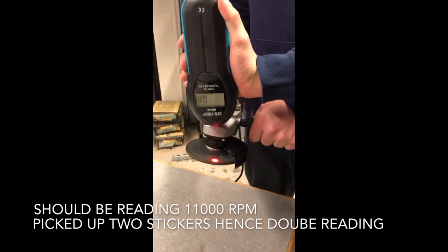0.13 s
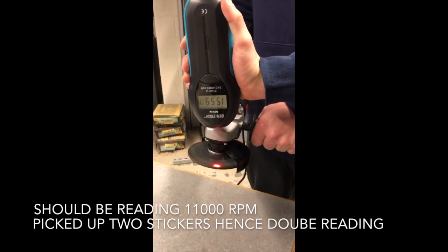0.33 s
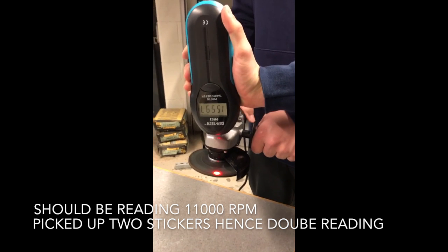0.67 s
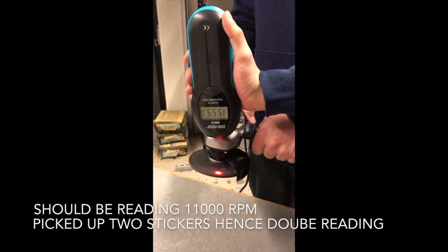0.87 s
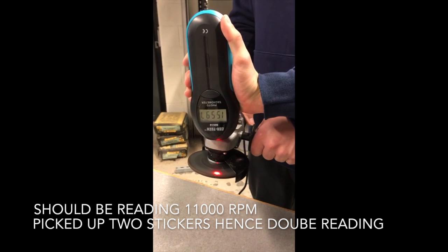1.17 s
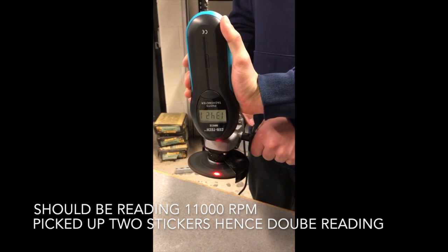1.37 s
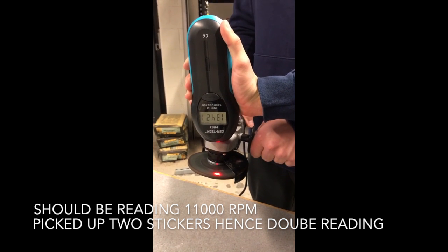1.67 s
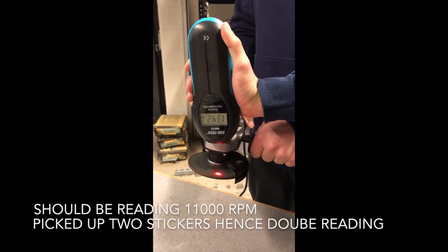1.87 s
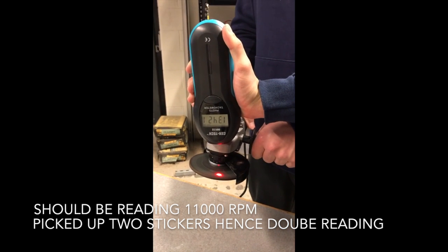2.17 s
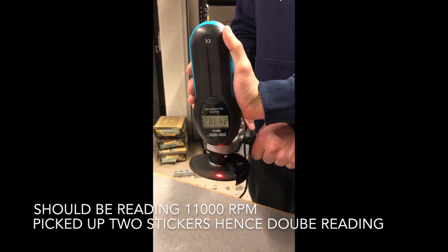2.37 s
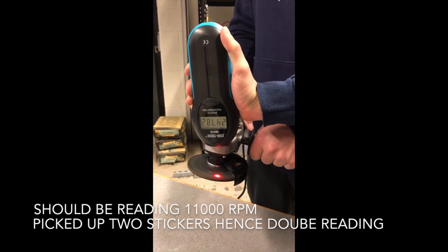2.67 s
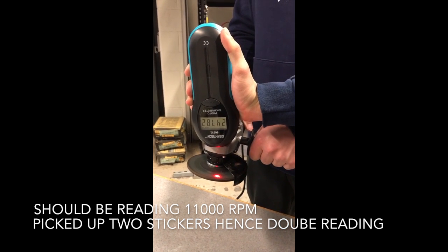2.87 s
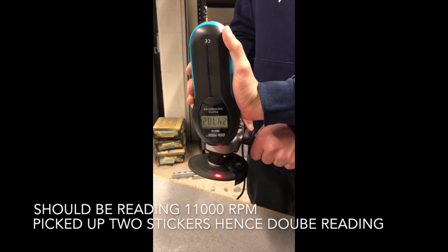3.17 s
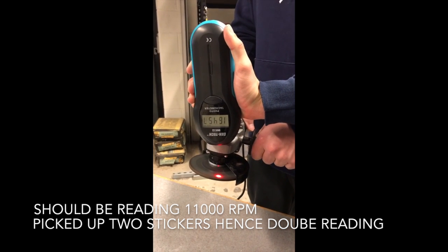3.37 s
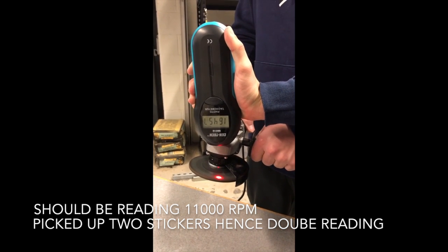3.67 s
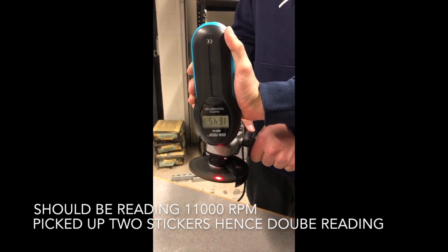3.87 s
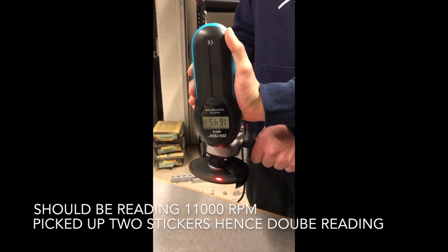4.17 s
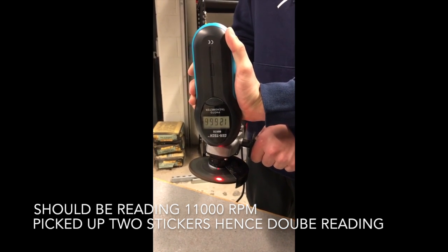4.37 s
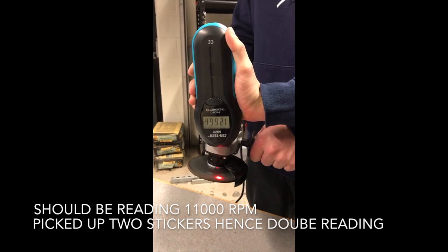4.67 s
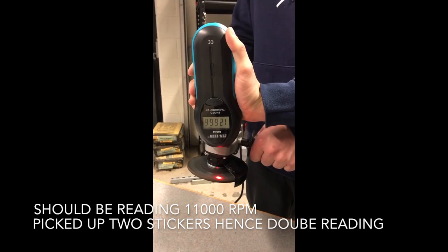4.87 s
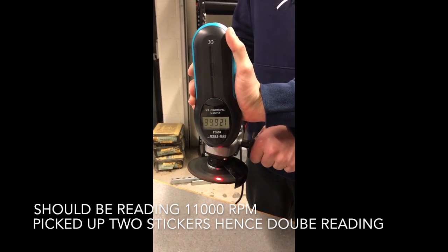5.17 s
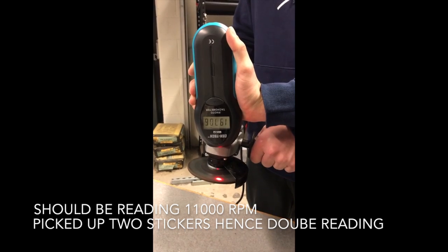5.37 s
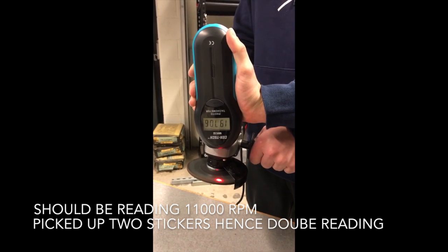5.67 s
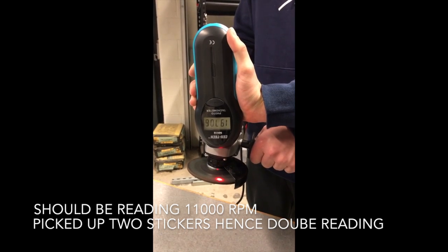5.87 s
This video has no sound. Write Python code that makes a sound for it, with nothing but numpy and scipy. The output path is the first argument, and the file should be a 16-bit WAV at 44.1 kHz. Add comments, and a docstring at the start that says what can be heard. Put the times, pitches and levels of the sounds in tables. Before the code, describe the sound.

An electric angle grinder is already spinning and climbs in pitch over the first two seconds or so. It then runs free at full speed, holding a steady high whine over a rush of fan air and thin hiss. Its gears rattle lightly throughout, with occasional sharper ticks. The tool sounds close, in a small workshop with little echo and a faint low hum.

```python
"""An angle grinder running free

The disc spins up over a workbench and settles near 10700 turns a minute. Spindle, rotor and gear
mesh radiate tones at fixed multiples of that one speed. Fan turbulence and tooth impacts supply
broadband noise, which the resonances of the housing colour. The gears rattle and now and then
knock in their backlash, under a thin hiss and over a low drone in the workshop."""
import sys
import numpy as np
from scipy import signal
from scipy.fft import rfft, irfft, next_fast_len
from scipy.io import wavfile
from scipy.ndimage import uniform_filter1d

SR = 44100
rng = np.random.default_rng(int(sys.argv[2]) if len(sys.argv) > 2 else 0)


def persist_wave(psi):
    """Save psi, clipped to +-1, as 16-bit WAV."""
    counts = np.round(np.clip(psi, -1, 1) * 32767).astype(np.int16)
    wavfile.write(sys.argv[1], SR, np.atleast_2d(counts).T)


N = 265349
TIME = np.arange(N) / SR
FFT_SIZE = next_fast_len(N + SR // 4, real=True) // 2 * 2
FREQS = np.arange(FFT_SIZE // 2 + 1) * SR / FFT_SIZE
PINION_TEETH, CROWN_TEETH = 12, 37  # on the rotor, on the spindle

# Bands of low rumble. Each row: centre in Hz, width in Hz, level in dB.
RUMBLE_BANDS = [(64, 14, -53.5), (79.7, 8.7, -50.5)]
# Course of the high hiss. Each row: time in seconds, centre in Hz, relative level in dB.
SIZZLE_COURSE = [(0, 9600, -37), (.25, 9800, -42), (.45, 9370, -40.5), (1.1, 9500, -43), (2.5, 9400, -37),
                 (2.9, 9350, -43), (4.4, 9420, -39), (4.8, 9800, -42), (6, 9684, -40)]
# Main mode of the gear head: centre in Hz, width in Hz, level in dB.
MAIN_MODE = (2226, 44, -41.5)
# Gear head modes under load. Each row: centre in Hz, width in Hz, level at full torque in dB.
STRAIN_MODES = [(1790, 79, -33), (4276, 250, -34), (5000, 520, -34), (5830, 440, -33), (7030, 140, -39),
                (7700, 300, -37)]
# Resonances of housing and gear head. Each row: centre in Hz, width in Hz, lift in dB.
HOUSING_MODES = [(1203, 196, 3.5), (2220, 110, 2.8), (2140, 990, 3), (3480, 400, 3.5), (4600, 378, 6),
                 (5084, 291, 6), (5383, 27, 8.5), (6170, 800, 7.5), (7037, 14, 4.4), (7661, 27, 3.5),
                 (9350, 1100, 6.5), (9900, 300, 3.5), (10400, 400, -1.5), (6850, 250, -2),
                 (12095, 140, 8.5), (12680, 480, 3.3), (14200, 500, 1.5), (15050, 450, 2)]
# Strength of the light rattle. Each row: time in seconds, mean relative peak in dB.
RATTLE_COURSE = [(0, -22), (0.85, -15.5), (1.5, -16.5), (2.7, -19), (3.3, -14.5), (4.3, -16.5), (6, -17)]
# The hardest backlash knocks. Each row: start in seconds, relative peak in dB.
HARD_KNOCKS = [(0.618, -11.5), (0.831, -12), (0.9517, -10), (0.9805, -10), (1.0103, -8), (1.046, -13),
               (1.2465, -14), (2.094, -14), (2.4239, -10), (2.5984, -10), (2.6389, -13), (2.7068, -11),
               (2.8983, -10), (3.1068, -11), (3.5813, -8.5), (3.715, -15), (3.8605, -13), (3.9045, -14),
               (3.9489, -13), (4.4566, -11), (4.5341, -12)]
# Spectrum of a knock ahead of the housing. Each row: frequency in Hz, relative level in dB.
KNOCK_SPECTRUM = [(500, -30), (2000, -13), (4200, -17), (5000, -9), (5600, -16), (6120, 2), (6500, 0),
                  (6900, -10), (7600, -7.5), (9400, -19), (11300, -19), (12150, -10), (12800, -10.5),
                  (16000, -15)]
# Spindle harmonics, from once a turn upwards. Each row: level in dB, change at full torque in dB.
SPINDLE_TONES = [(-64.5, 13), (-62.5, 4), (-53.5, 10), (-51, 0.5), (-40, -10), (-47.5, -3), (-46, 7),
                 (-70, 9.5), (-51.5, -4)]
# Rotor tones as multiples of the rotor's speed; the 12th and 24th belong to the gear mesh.
ROTOR_ORDERS = [1, 2, 3, 4, 5, 12, 18, 24]
# Strength of those orders. Each row: level before resonance in dB, change at full torque in dB.
ROTOR_TONES = [(-46, 2.5), (-50, -8), (-53.5, 12.5), (-47, -6), (-52, 21), (-48, 11), (-59, 0), (-54, 1.5)]
# Resonances that the rotor's tones sweep through. Each row: centre in Hz, width in Hz, lift in dB.
SWEPT_MODES = [(493, 40, 7.5), (526, 24, -4), (1440, 130, 10)]
# Spectrum of air and clatter ahead of the housing. Each row: frequency in Hz, relative level in dB.
RUSH_SPECTRUM = [(30, -18), (130, -15.5), (280, -16.5), (480, -18), (700, -14.5), (1000, -5), (1550, -5),
                 (2400, 1), (4000, -6), (5600, -10.5), (8200, -11), (10600, -16), (13000, -10.5),
                 (16000, -13.5)]
# The clatter's part in that spectrum. Each row: frequency in Hz, share in dB before it is capped.
CLATTER_SHARE = [(500, -17.5), (2300, -7.5), (4500, -2), (6500, -3), (10000, 0.5), (15000, -3.5)]


def undb(db):
    """Amplitude grows tenfold with every 20 dB."""
    return 10 ** (np.asarray(db) / 20)


def unit(x):
    """Division by the rms gives a signal unit power."""
    return x / np.sqrt(np.mean(x ** 2))


def curves(table):
    """Linear interpolation gives each column of a timed table one value a sample."""
    times, *columns = np.transpose(table)
    return [np.interp(TIME, times, column) for column in columns]


def slope_db(points):
    """A spectral envelope in dB runs straight between its points over log frequency."""
    hz, db = np.transpose(points)
    return np.interp(np.log(FREQS + 1), np.log(hz), db)


def lift_db(hz, modes):
    """Each resonance adds a Lorentzian peak or dip to the response in dB."""
    return sum(db / (1 + (2 * (hz - centre) / width) ** 2) for centre, width, db in modes)


def through_housing(points):
    """Source and filter add in dB: a spectrum takes on the housing's resonances, at unit power."""
    db = slope_db(points) + lift_db(FREQS, HOUSING_MODES)
    return db - 10 * np.log10(np.mean(undb(db) ** 2))


def colour(x, db):
    """A minimum-phase filter is causal, so its resonances ring after each push."""
    cepstrum = irfft(np.log(undb(db)))
    cepstrum[1:FFT_SIZE // 2] *= 2
    cepstrum[FFT_SIZE // 2 + 1:] = 0
    return irfft(rfft(x, FFT_SIZE) * np.exp(rfft(cepstrum)))[:N]


def walk(rate_hz):
    """Low-passed noise of rms 1 wanders about rate_hz times a second."""
    white = rfft(rng.standard_normal(FFT_SIZE))
    return unit(irfft(white * np.exp(-(FREQS / rate_hz) ** 2))[:N])


def band(hz, width_hz):
    """A resonance driven at random yields a band of noise, here of rms 1."""
    white = rfft(rng.standard_normal(FFT_SIZE))
    return unit(irfft(white / (1 + 2 * ((FREQS - hz) / width_hz) ** 2))[:N])


def torque(spin_hz):
    """The accelerating load on the gears falls from 1 to 0 as the motor nears full speed."""
    return (spin_hz.max() - spin_hz) / np.ptp(spin_hz)


def workshop(x, wet_db=-19, t60_s=.25):
    """Reflections from bench, shelves and walls merge into a short exponential tail."""
    tail = rng.standard_normal(N) * undb(-60 * TIME / t60_s) * (TIME > .002)
    return x + undb(wet_db) * signal.fftconvolve(x, tail / np.linalg.norm(tail))[:N]


def drone(spin_hz, hum_hz=219.5, hum_db=-53.5, load_db=5, waver_db=2.9, drift=0.0017):
    """Narrow noise bands heave slowly, under a hum that wavers and eases with the load."""
    phase = 2 * np.pi * np.cumsum(hum_hz * (1 + drift * walk(4.9))) / SR
    level_db = hum_db + load_db * torque(spin_hz) + waver_db * walk(3.5)
    hum = np.sqrt(2) * undb(level_db) * np.sin(phase)
    return hum + sum(undb(db) * band(hz, width) for hz, width, db in RUMBLE_BANDS)


def sizzle(width_hz=260, gain_db=2.0):
    """Noise modulating a wandering carrier makes a thin metallic hiss, likely that of the brushes."""
    hz, db = curves(SIZZLE_COURSE)
    phase = 2 * np.pi * np.cumsum(hz) / SR
    hiss = band(0, width_hz) * np.cos(phase) + band(0, width_hz) * np.sin(phase)
    return undb(db + gain_db) * hiss


def gear_head_ring(surge_db=2.5, surge_hz=5):
    """Random excitation by the clatter sustains the gear head's main mode, in short surges."""
    hz, width, db = MAIN_MODE
    return undb(db) * unit(band(hz, width) * undb(surge_db * walk(surge_hz)))


def gear_strain(spin_hz):
    """Loaded teeth drive the gear head's modes with an amplitude proportional to the torque."""
    return sum(undb(db) * band(hz, width) for hz, width, db in STRAIN_MODES) * torque(spin_hz)


def runout(spin_hz, rub_db=-24):
    """An eccentric crown wheel bites once a turn, giving a force pulse that is mostly light."""
    turns = np.cumsum(spin_hz) / SR
    bite = rng.random(N)[turns.astype(int)] ** 2
    return undb(rub_db) * bite * np.sin(np.pi * turns) ** 2


def bounces(spin_hz, free_hz=24.98, load_hz=21.88, jitter=0.15, scatter_db=3.0):
    """Backlash lets the wheel bounce. Each row returned: start in seconds, relative peak in dB."""
    rate_hz = (free_hz + load_hz * torque(spin_hz)) * (1 + jitter * walk(20))
    onsets = np.flatnonzero(np.diff(np.floor(np.cumsum(rate_hz) / SR)) > 0)
    mean_db, = curves(RATTLE_COURSE)
    peak_db = mean_db + scatter_db * (2 * rng.random(N) - 1)
    hard_s = np.transpose(HARD_KNOCKS)[0]
    # a bounce within half a period of a hard knock gives way to it
    return [(TIME[i], peak_db[i]) for i in onsets if np.abs(hard_s - TIME[i]).min() * rate_hz[i] > .5]


def backlash_knocks(spin_hz, gain_db=-6.0, rise_s=0.0021, width_s=0.00098, tail_db=-14, tail_s=.007):
    """Crossing its backlash, the wheel strikes in a brief pulse; the gear head's ring then decays."""
    force = runout(spin_hz)
    for start_s, db in list(HARD_KNOCKS) + bounces(spin_hz):
        near = np.abs(TIME - start_s) < .05
        age = TIME[near] - start_s - rise_s
        blow = np.exp(-.5 * (age / width_s) ** 2)
        tail = undb(tail_db) * (age > 0) * np.exp(-np.abs(age) / tail_s)
        force[near] = np.maximum(force[near], undb(db) * (blow + tail))
    metal = colour(rng.standard_normal(N), through_housing(KNOCK_SPECTRUM))
    analytic = signal.hilbert(metal, FFT_SIZE)[:N]
    envelope = np.sqrt(uniform_filter1d(np.abs(analytic) ** 2, size=96))
    # with the metal's envelope divided out, the force alone sets how loud each blow is
    return undb(gain_db) * force * unit(analytic.real / envelope)


def whine(spin_hz, waver_db=0.97, waver_hz=5, wobble=0.0007):
    """Gearing locks two harmonic series; the rotor's fundamental beats with the spindle's third tone."""
    turns = np.cumsum(spin_hz * (1 + wobble * walk(9.2))) / SR
    ratio, load = CROWN_TEETH / PINION_TEETH, torque(spin_hz)

    def tone(multiple, db, load_db):
        gain = undb(db + load_db * load + waver_db * walk(waver_hz))
        return np.sqrt(2) * gain * np.sin(2 * np.pi * (multiple * turns + rng.random()))

    spindle = sum(tone(k, db, load_db) for k, (db, load_db) in enumerate(SPINDLE_TONES, 1))
    rotor = sum(tone(k * ratio, db + lift_db(k * ratio * spin_hz, SWEPT_MODES), load_db)
                for k, (db, load_db) in zip(ROTOR_ORDERS, ROTOR_TONES))
    return spindle + rotor


def fan_air(flutter_db=.5, flutter_hz=79):
    """Turbulence at the cooling fan and the disc's rim makes fluttering broadband noise."""
    return unit(rng.standard_normal(N) * undb(flutter_db * walk(flutter_hz)))


def tooth_clatter(spin_hz, scatter_db=6.0, chatter_db=4.0, chatter_hz=220, surge_db=-1.1, surge_hz=35):
    """Tooth impacts of unequal force modulate noise at the mesh rate, in short surges."""
    tooth = (np.cumsum(spin_hz) / SR * CROWN_TEETH).astype(int)
    force_db = scatter_db * rng.standard_normal(N)[tooth]
    force_db += chatter_db * walk(chatter_hz) + surge_db * walk(surge_hz)
    cushioned_db = np.minimum(force_db, 4.5)  # grease softens the hardest blows
    return unit(rng.standard_normal(N) * undb(cushioned_db))


def rush(spin_hz, air_gain_db=-20.5, clatter_gain_db=-20, ease_db_per_s=0.14):
    """Air and clatter add in power through one resonant housing; the clatter rules the treble."""
    load = torque(spin_hz)
    air_db = air_gain_db - 0.8 * load
    clatter_db = clatter_gain_db + 0.9 * load - ease_db_per_s * TIME  # eases as the grease spreads
    shape_db = through_housing(RUSH_SPECTRUM)
    clatter_share_db = np.minimum(slope_db(CLATTER_SHARE), -.5)
    air_share_db = 10 * np.log10(1 - undb(clatter_share_db) ** 2)
    air = colour(fan_air() * undb(air_db), shape_db + air_share_db)
    clatter = colour(tooth_clatter(spin_hz) * undb(clatter_db), shape_db + clatter_share_db)
    return air + clatter


def spindle_speed(full_hz=177.54, shortfall_hz=33.74, run_up_s=0.798, creep_hz_per_s=0.184):
    """As a first-order system the motor nears full speed exponentially; it creeps up as it warms."""
    return full_hz - shortfall_hz * np.exp(-TIME / run_up_s) + creep_hz_per_s * TIME


def scene():
    """The sources superpose, with one speed driving the tool; only its noise reverberates."""
    spin_hz = spindle_speed()
    noise = rush(spin_hz) + gear_head_ring() + gear_strain(spin_hz) + sizzle() + backlash_knocks(spin_hz)
    return (whine(spin_hz) + workshop(noise) + drone(spin_hz))[None]


def record(dry, low_hz=38, top_hz=15750):
    """The microphone chain is band-limited: it loses the deep bass and cuts the top steeply."""
    thin = signal.sosfilt(signal.butter(4, low_hz, "high", fs=SR, output="sos"), dry)
    return signal.sosfilt(signal.ellip(12, .1, 90, top_hz, fs=SR, output="sos"), thin)


dry = scene()
out = record(dry)
persist_wave(out)
```